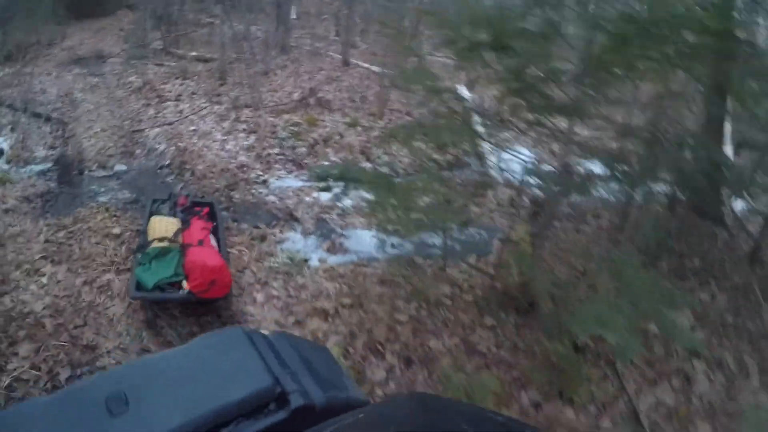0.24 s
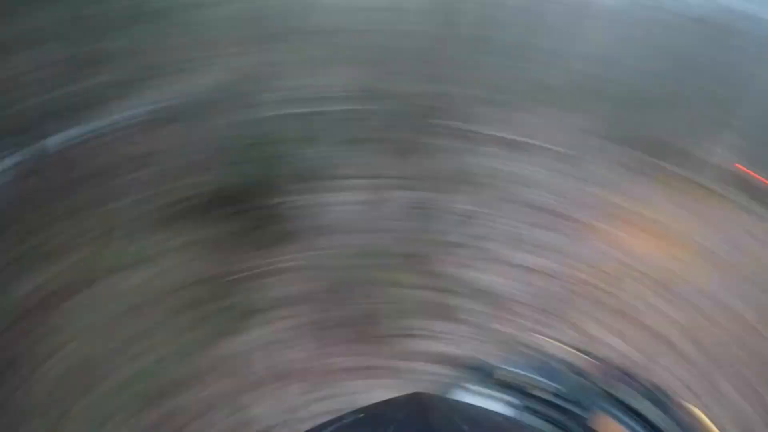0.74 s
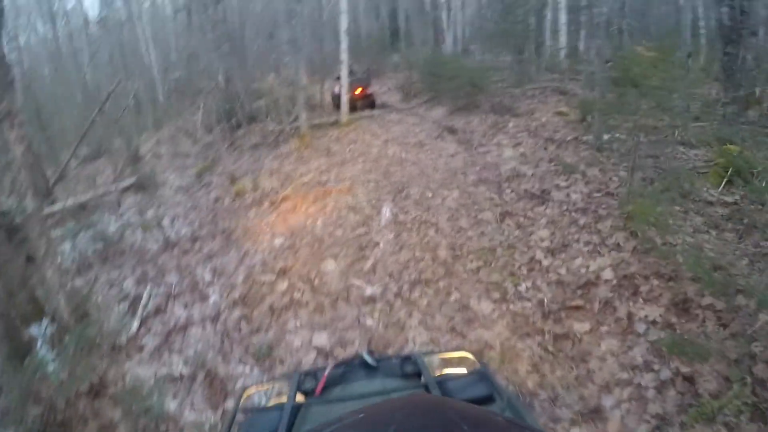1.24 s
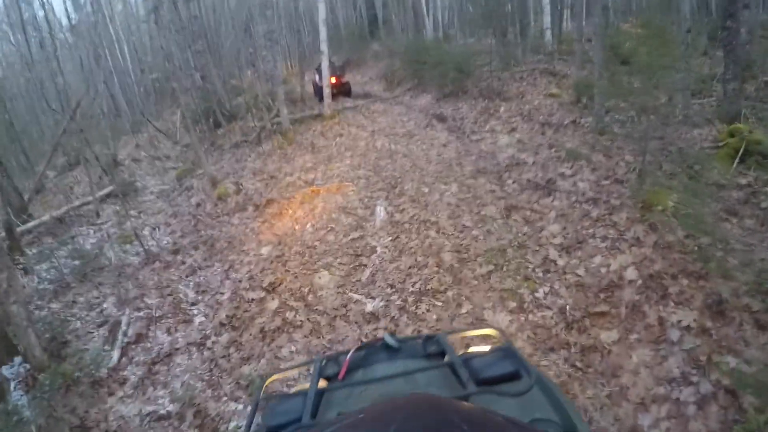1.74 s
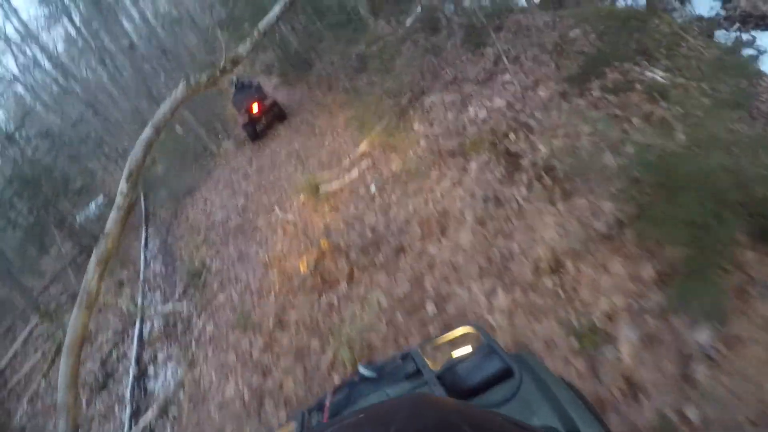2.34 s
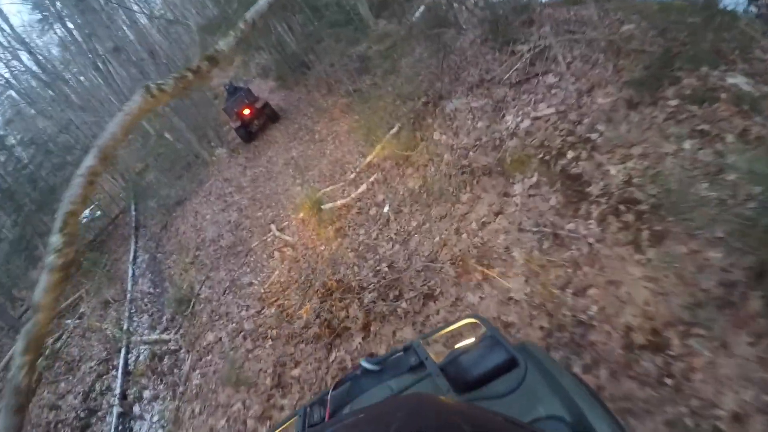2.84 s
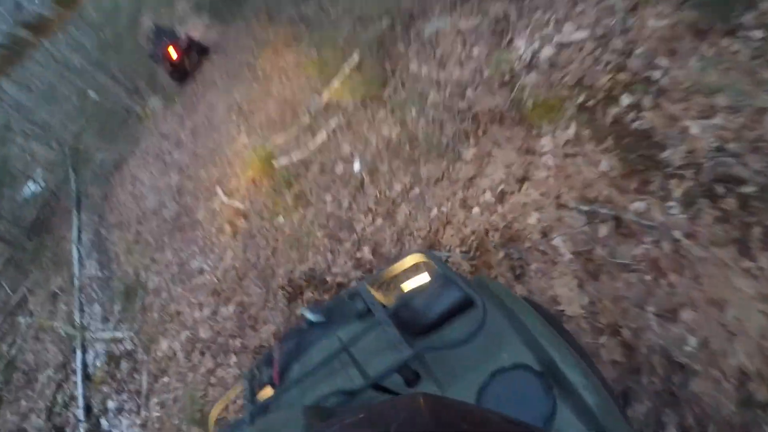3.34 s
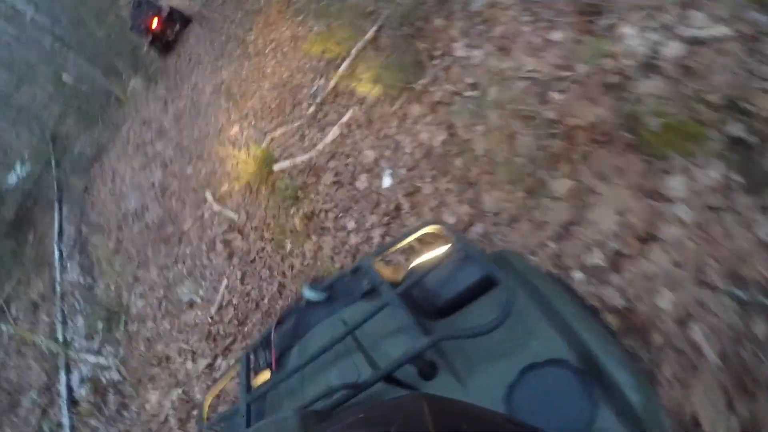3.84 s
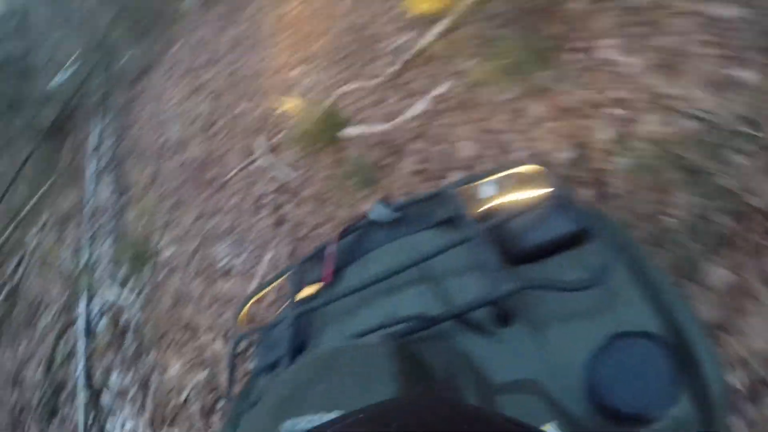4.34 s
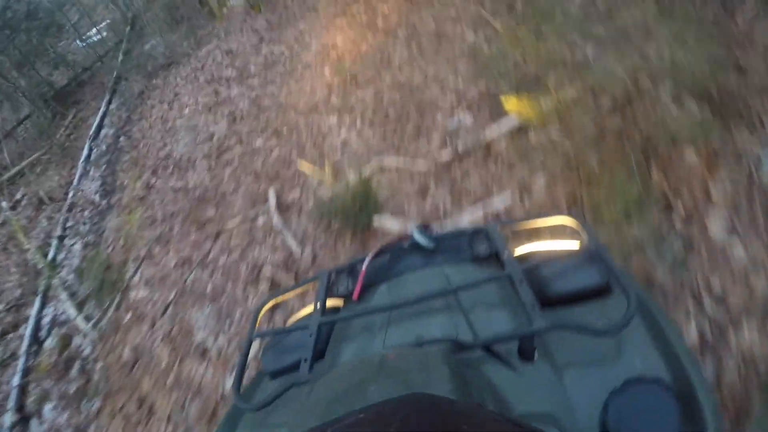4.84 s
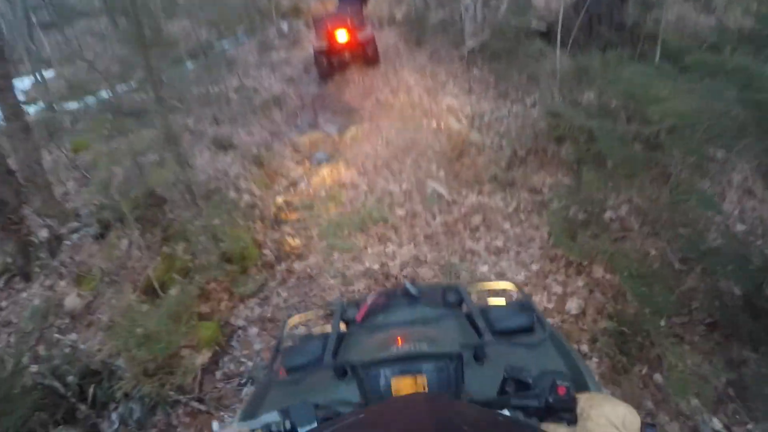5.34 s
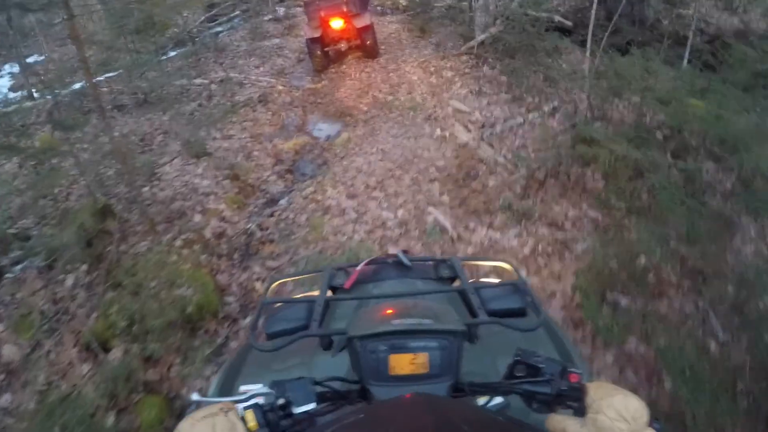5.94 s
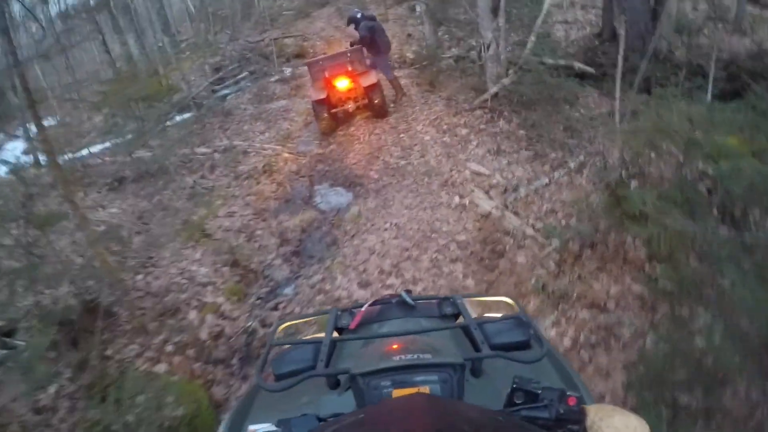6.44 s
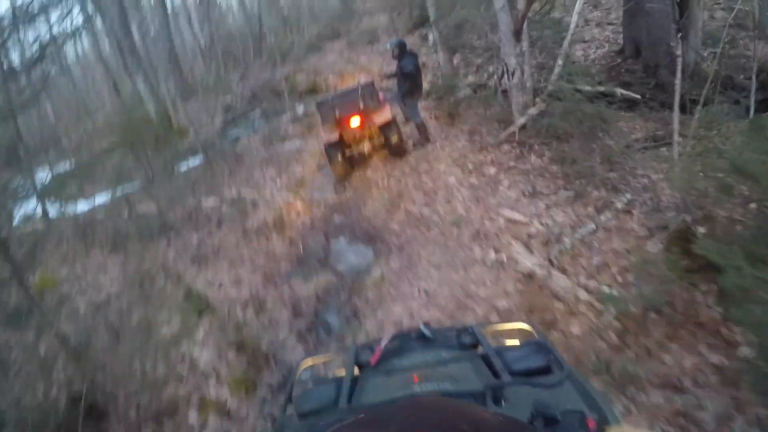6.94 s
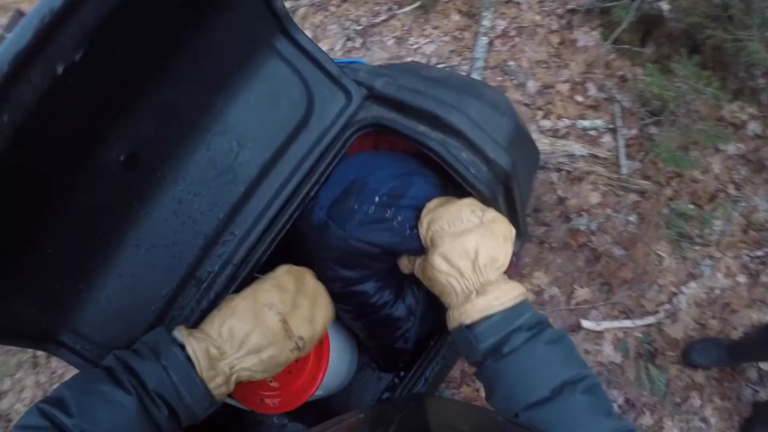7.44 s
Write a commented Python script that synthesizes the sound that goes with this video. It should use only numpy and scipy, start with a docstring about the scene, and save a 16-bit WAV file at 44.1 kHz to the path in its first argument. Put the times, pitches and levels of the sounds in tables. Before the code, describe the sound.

From 0 to 1.1 s a close single-cylinder quad putters at about 14 low thumps per second, with wind rumble, leaf swishes and a cluster of dry twig cracks at 0.2-0.4 s. Around 1.1 s more snaps come as the throttle opens; the engine climbs to about 24 pulses per second, barking and growling until 2.0 s. A hard cut drops it to near idle, with stronger clatter and hissy rustle and the second quad droning ahead. Leaves swish at 2.6 and 3.5 s. At 3.8 s a dull knock hits the microphone housing; the sound sinks, wavers and narrows to the centre, with a modest rev near 4.5 s. At 5.1 s another cut restores level and width: slow idle, the far quad swelling near 5.7 s, a blip at 6.4 s and a rise just before 7.4 s. The last 0.3 s is idle with quick small rustles.

```python
"""Two quads on a leafy trail

A single-cylinder quad idles and revs, heard from the rider's helmet; a second quad runs ahead.
Each firing is a soft-edged click that rings the exhaust; clean tones locked to the crank hum in the frame.
Noise shaped in bands makes the pulsing clatter, the rustling leaves, the hiss and the low wind; twigs snap.
The ride is heard in four joined takes; within the second, at 3.8 s, the balance changes:
after a knock on the microphone housing the sound sinks, narrows and comes back."""
import sys
import numpy as np
from scipy import signal
from scipy.io import wavfile
from scipy.ndimage import uniform_filter1d

SR = 44100
rng = np.random.default_rng(int(sys.argv[2]) if len(sys.argv) > 2 else 0)


def unload_wav(signal):
    """Save mono or channel-first audio to the path in sys.argv[1] as 16-bit WAV at rate SR, clipped to [-1, 1]."""
    wavfile.write(
        sys.argv[1],
        SR,
        np.round(np.clip(np.atleast_2d(signal).T, -1, 1) * 32767).astype(np.int16),
    )


N = 339129  # length in samples

# Times where the balance changes, dividing the sound into five stretches of balance: t/s
STRETCH_STARTS = [2.041, 3.797, 5.09, 7.39]
CHANGE_S = 0.016  # how long each change of balance takes
# Speed of the near engine: t/s, rate/firings per s
NEAR_SPEED = [(0, 14.45), (.45, 13.82), (1.11, 14.53), (1.24, 20.83), (1.51, 21.27), (1.71, 24.22),
              (2.03, 24.22), (2.05, 14.03), (3.32, 14.03), (3.96, 14.71), (4.52, 18.81), (4.74, 15.57),
              (5.08, 14.07), (5.1, 13.13), (5.94, 13.56), (6.34, 13.42), (6.44, 16.06), (6.94, 14.17),
              (7.38, 19.45), (7.4, 13.89), (7.69, 13.88)]
# Its crank position at the start and its jumps where the scene cuts: t/s, jump/cycles
NEAR_JUMPS = [(0, -.44), (2.04, -.42), (5.09, -.39), (7.39, -.43)]
# Speed of the far engine: t/s, rate/firings per s
FAR_SPEED = [(0, 21.83), (.66, 21.3), (2.25, 21.36), (2.65, 21.84), (3.26, 17.09), (3.51, 18.89),
             (4.29, 18.05), (5.08, 20.8), (5.1, 14.33), (5.54, 15.15), (7.38, 14.86), (7.4, 14.78),
             (7.69, 14.78)]
# Its crank position at the start and its jumps where the scene cuts: t/s, jump/cycles
FAR_JUMPS = [(0, -.51), (5.09, -.15), (7.39, -.45)]
IDLE_PER_S = 14  # firings per s at idle
# How far the throttle is open: t/s, opening/0-1
THROTTLE = [(0, 0.23), (1.1, 0.54), (1.15, 1), (1.47, 0.73), (1.54, 1), (1.7, 1), (2.03, 0.87), (2.05, 0.1),
            (3.2, 0), (3.5, 0.48), (4.25, 0), (4.33, 0.47), (4.55, 0.53), (4.8, 0.46), (6.33, 0.18),
            (6.39, 0.8), (6.6, 0.24), (6.8, 0.49), (6.95, 0.51), (7.2, 0.87), (7.38, 0.36), (7.4, 0),
            (7.69, 0.3)]
# Dip in level after the knock: t/s, level/dB
DIP = [(3.79, -5), (3.87, -13.5), (4.0, -6), (4.2, -12), (4.35, -10), (4.56, -4), (5.07, -1.5), (5.1, 3)]
# Stereo width: t/s, width/0-1
STEREO_WIDTH = [(0, 0.55), (4.1, 0.96), (4.5, 0.06), (4.6, 0), (5.07, 0), (5.09, 0.6), (7.69, 0.71)]
# How alike left and right noise are: f/Hz, likeness/-1 to 1
LIKENESS = [(100, 0.92), (250, 0.79), (500, 1), (1000, -0.7), (2500, 0.2), (5000, -0.14), (12000, -0.83)]
# Left minus right at full width, for noise: f/Hz, level/dB
NOISE_LEAN = [(150, 0), (400, -8.5), (1000, -9.5), (2400, -5), (5000, -3.5), (8000, -10.5), (13000, -14.5)]
LOW_LEAN_DB, LOW_LAG_MS = -4, 0.17  # low engine tones at full width: left minus right, right after left

# Ringing tones (modes) all have columns: f/Hz, level/dB, time to fall 60 dB/s, delay/ms
# Near exhaust: low thump
THUMP_MODES = [(102, 0, .085, 0)]
# Near exhaust: steady-sounding low drone
DRONE_MODES = [(120, 0, .2, 2)]
# Near exhaust: bark, columns as above
BARK_MODES = [(217.1, 7.5, 0.096, 0)]
# First ringing that makes the bark build up over a few cycles
BARK_SWELL_MODES = [(225.4, 0, 0.038, 0)]
# Near exhaust: upper throaty tones
THROAT_MODES = [(238.6, 9, 0.095, 0.56), (283.7, -6, 0.16, 0.81), (356.4, -3.5, 0.08, 0.4),
                (424, -3, 0.076, 0.71), (507, -4, 0.071, 0.35), (604, -4, 0.1, 0.42)]
# Exhaust of the quad ahead
FAR_MODES = [(93.6, 2.5, 0.19, 0.29), (125, 5.5, 0.18, -0.22), (219, -9.5, 0.18, 0.7), (298, -16.5, 0.1, 1)]
# Valve ticks
VALVE_MODES = [(2910, -1.5, 0.037, -0.038), (3170, -21, .03, -1.5)]
# Piston slaps
PISTON_MODES = [(730, 3, 0.03, 0), (1270, 1, 0.025, 0), (1800, -1, 0.02, 0)]
# Housing of the microphone
KNOCK_MODES = [(344, -7.5, 0.11, 0), (526, -19, 0.033, 0)]
KNOCK_S = 3.788  # time of the knock

# Layer levels all have columns: five stretch levels/dB, change at full throttle/dB,
# change per firing per s above idle/dB, share of the dip/1
# Exhaust thump
THUMP_LEVEL = (-20, -19.5, -20, -25, -24, 2, -1.0, 1.13)
# Exhaust drone
DRONE_LEVEL = (-20, -21, -27, -25, -23, -2, -.8, 1.2)
# Exhaust bark
BARK_LEVEL = (-21, -25, -27, -32, -28, 9, -0.45, 1.32)
# Exhaust throat
THROAT_LEVEL = (-31, -38, -41.5, -37, -35, 8, 0.96, 1.44)
# Growl at five times the firing rate, stronger under load
GROWL_LEVEL = (-28.5, -23, -32, -38, -40, 12.5, 0.85, 1.63)
# Delay of bark and throat behind the thump: same columns, but in ms (the last is ms per dB of dip)
BARK_LAG = (4, 6, 5.5, 1.5, 1, 1.5, -.8, .5)
# Lower clatter
CLATTER_LEVEL = (-30.5, -29, -40.5, -35.5, -38.5, 3.5, 0.4845, 0.86)
# Upper clatter
UPPER_CLATTER_LEVEL = (-51, -42.5, -61, -52, -52, 10, 0.69, 0.34)
# Engine case
CASE_LEVEL = (-36.5, -28, -40.5, -35.5, -42.5, 2, 0.68, 1.14)
# Valve clicks, before they ring
VALVE_LEVEL = (-58, -54, -76, -62, -56, 17, 1.5, .1)
# Piston clicks, before they ring
PISTON_LEVEL = (-39, -40, -43, -37, -38, 7, 0.35, 0.15)
# Leaf rustle
RUSTLE_LEVEL = (-52, -46, -57, -49.5, -67, -10, -0.02, 0.5)
# Highest part of the rustle
RUSTLE_TOP_LEVEL = (-49.5, -38.5, -63.5, -57.5, -63.5, 7.5, 0.5, 1)
# Band of hiss
HISS_LEVEL = (-56, -72, -54.5, -72, -74, -2, 0.93, 1)
# Wind
WIND_LEVEL = (-20, -26, -30, -30.5, -29, -3, 0, 1.33)
# Crank shaking the frame: times per turn/1, sense/1, layer level (columns as above)
FRAME_SHAKES = [(1, 1, (-25, -20, -42, -48, -37, 7, 1.03, 3)),
                (2, -0.6, (-13, -17.5, -25, -27, -29.5, 3, -1.0, 1.85)),
                (3, 0.89, (-30.5, -26, -48, -47, -38, 7.5, 2.16, 4.7)),
                (4, 0.92, (-44, -40, -68, -34.5, -54, 3.5, 1.03, -0.8))]
# Level of the far exhaust: t/s, level/dB
FAR_LEVEL = [(0, -20.5), (.55, -20), (1.1, -20.5), (2, -37), (2.1, -16), (2.9, -18.5), (3.1, -19),
             (3.8, -18.5), (4, -34.5), (5.1, -22.5), (5.7, -14.5), (6.3, -25), (7, -21.5), (7.69, -19.5)]

# Noise colours all have columns: f/Hz, relative level/dB per Hz
# Lower clatter
CLATTER_LOW = [(220, 5), (300, 2.5), (450, -5), (600, -3), (760, -7), (1000, -5), (1400, -16),
               (1900, -30.5)]
# Upper clatter
CLATTER_HIGH = [(880, -15), (1500, 3), (1780, -9.5), (2060, -2.5), (2370, -7.5), (2950, -4.5),
                (3330, -11.5), (4600, -12.5), (5980, -45), (10100, -120)]
# Rustle
RUSTLE_LOW = [(2350, 3), (4000, -6.5), (4840, 0), (7400, -2), (9620, -0.5), (16300, -120)]
# Top of the rustle
RUSTLE_TOP = [(4000, -27), (6800, 7.5), (7660, -7), (10100, -2.5), (11300, -13), (12500, -28.5),
              (14300, -29), (15300, -35)]
# Resonances of the engine case: f/Hz, width/Hz, level/dB
CASE_RESONANCES = [(736, 86, -9.5), (1174, 110, -8.5), (1810, 180, -36)]
# Edges of the hiss band: f/Hz
HISS_BAND = (4400, 6500)
# Brief swells of the rustle: peak t/s, rise/s, fall/s, level/dB, top above it/dB, dull scrape above it/dB
SWISHES = [(.1, 0.074, 0.039, -47.5, 3.5, -5), (.34, 0.018, .04, -47, 1, 1), (.68, 0.11, .04, -49.5, 1, 3),
           (.8, 0.038, 0.06, -46.5, -10, 9), (2.089, 0.013, 0.14, -46.5, -12, -10),
           (2.3, 0.15, 0.06, -59, 1, -10), (2.63, 0.089, 0.087, -40.5, -2, -7),
           (3.5, 0.18, 0.21, -42, 1, 7), (3.98, 0.077, 0.07, -50.5, -2, 0.5),
           (5.55, .03, 0.075, -41, -11, 1.5), (7.17, 0.01, 0.03, -48, 1, -5.5),
           (7.431, 0.0099, 0.022, -52.5, 9, -20), (7.5, 0.0067, 0.019, -48, 4.5, -14),
           (7.57, 0.0062, 0.017, -51, 5.5, -10), (7.67, 0.029, 0.038, -42.5, 2, -2)]
# Twigs snapping under the wheels: t/s, level/dB, f/Hz, width/octaves, treble above it/dB, thud above it/dB
TWIG_SNAPS = [(.089, -38, 1400, 1.3, 2, 1), (.214, -22, 2530, 0.25, -44, 2),
              (0.299, -26, 1000, 1.3, -28, 10), (0.329, -35, 1400, 1.8, -6, 1),
              (0.348, -25.5, 1520, 0.88, -28, 15), (0.373, -31, 1500, 1.4, -24, -9),
              (1.128, -25, 2700, 0.67, -20, 12), (1.149, -22.5, 1700, 0.87, -30, -3),
              (1.185, -24.5, 2300, 0.93, -30, -6), (2.072, -29, 1400, 2., -6, -8),
              (2.473, -33.5, 1400, 2., 5, 8), (3.412, -26.5, 1600, 1.6, -4, -6),
              (3.853, -36, 2500, 0.71, -22, -2), (5.005, -32, 1160, 0.72, -30, -17),
              (5.544, -31.5, 1800, 3.4, -23, 19.5), (7.172, -30, 1400, 2.3, -18, -3)]

PIPE_CUT_HZ = 64.4  # the open pipe radiates little below this
SILENCER_HZ = 25  # the silencer's volume smooths the low pulses above this
UNEVEN_DB, STEADIER_DB_PER_SPEED = 2.2, .16  # spread of firing strength at idle, less per firing/s above
SHAKE_LAG, SHAKE_LAG_PER_SPEED = 1.25, .035  # radians of crank angle at idle, more per firing/s above
CASE_PULSE_DB = 3.5  # half of the extra drop between firings in the case sound
PUFF_DB, PUFF_DB_AT_FULL = 1, 3  # half of the rustle's drop between firings: closed, added at full throttle
CUTOFF_HZ = 15600  # the top is fully cut from here up

SIDES = np.array([[1], [-1]])  # left, right


def from_db(db):
    """Turn a level in dB into a gain."""
    return 10 ** (np.asarray(db) / 20)


def rms_one(x):
    """Scale a sound to an average strength (rms) of 1."""
    return x / np.sqrt(np.mean(x ** 2) + 1e-20)


def in_time(rows):
    """Draw straight lines between the rows of a table, giving one curve per column."""
    s, *columns = np.transpose(rows)
    return [np.interp(np.arange(N) / SR, s, column) for column in columns]


def at_hz(points, hz):
    """Read a table at a pitch, with octaves equally spaced."""
    table_hz, values = np.array(points).T
    return np.interp(np.log(hz), np.log(table_hz), values)


def above_idle():
    """Near engine speed above idle, in firings per s."""
    return in_time(NEAR_SPEED)[0] - IDLE_PER_S


def stretch_at(s):
    """Number of the stretch of balance at time s, counted from 0."""
    return np.searchsorted(STRETCH_STARTS, s)


def level(layer):
    """Add up a layer's value from its stretch, the throttle, the speed and the dip."""
    *stretch_values, at_full_throttle, per_speed, share = layer
    stretch = stretch_at(np.arange(N) / SR)
    held = uniform_filter1d(np.array(stretch_values, float)[stretch], size=int(CHANGE_S * SR))
    return held + at_full_throttle * in_time(THROTTLE)[0] + per_speed * above_idle() + share * in_time(DIP)[0]


def drift(rate):
    """Slow random wander with spread 1: noise smoothed twice at rate Hz."""
    r = np.exp(-80 * np.pi * rate / SR)  # computed on every 40th sample
    noise = rng.standard_normal(N // 40 + 2002)
    slow = signal.lfilter([1], [1, -2 * r, r * r], noise)[2000:]
    return np.interp(np.arange(N) / 40, np.arange(len(slow)), rms_one(slow))


def crank(speed, jumps):
    """Count the firings so far; after a backward jump the count holds until it catches up."""
    turned = np.cumsum(in_time(speed)[0]) / SR
    turned = turned + sum(cycles * (np.arange(N) >= s * SR) for s, cycles in jumps)
    return np.maximum.accumulate(turned)


def strokes(firings, lead, uneven_db):
    """One click per cycle, each of its own strength, lead seconds ahead of the firing count."""
    at = np.flatnonzero(np.diff(np.floor(firings))) - lead * SR
    at = np.clip(at + rng.normal(0, 6, len(at)), 0, N - 1).astype(int)  # a few samples of jitter
    clicks = np.zeros(N)
    clicks[at] = -from_db(np.broadcast_to(uneven_db, N)[at] * rng.standard_normal(len(at)))
    return clicks


def softened(clicks, hz):
    """Round the edges of clicks, as in a gas pulse."""
    return signal.sosfilt(signal.butter(2, hz, fs=SR, output="sos"), clicks + 1e-18)


def ring(clicks, modes):
    """Clicks set fading tones ringing, neighbours in opposite sense, each with its own delay."""
    out = 0
    for k, (hz, level_db, t60, delay_ms) in enumerate(modes):
        r, w = from_db(-60 / (t60 * SR)), 2 * np.pi * hz / SR
        late = np.roll(clicks, round(delay_ms / 1000 * SR))
        tone = signal.lfilter([0, np.sin(w)], [1, -2 * r * np.cos(w), r * r], late + 1e-18)
        out = out + (-1) ** k * from_db(level_db) * tone
    return out


def rattled(clicks, seconds):
    """Each contact chatters briefly: a burst of noise that fades after every click."""
    fading = signal.lfilter([1], [1, -np.exp(-1 / (seconds * SR))], np.abs(clicks))
    return rng.standard_normal(N) * fading / np.sqrt(seconds * SR / 2)


def puffing(depth_db, ahead):
    """Gain that jumps once a cycle and then drops by twice the depth, with mean power 1."""
    cycle = (crank(NEAR_SPEED, NEAR_JUMPS) + ahead) % 1
    gain = from_db(-2 * np.clip(depth_db, 0, 12) * np.minimum(2.7 * cycle, 1))
    return gain / np.sqrt(uniform_filter1d(gain ** 2, size=SR // 7))


def banded_noise(spectrum, width, patchy_db):
    """Stereo noise in third-octave bands, each with its level, flicker, likeness and lean; middle rms 1."""
    out, together = 0, drift(3.7)
    lowest, highest = spectrum[0][0], spectrum[-1][0]
    edges = lowest * 2 ** np.arange(0, np.log2(highest / lowest) + 1 / 3, 1 / 3)
    white = rng.standard_normal((2, 2, N))
    for k, (low, high) in enumerate(zip(edges, edges[1:])):
        band = signal.butter(2, [low, high], "band", fs=SR, output="sos")
        mid, side = signal.sosfilt(band, white[k % 2])
        hz = np.sqrt(low * high)
        alike = np.clip(at_hz(LIKENESS, hz), -1, 1)
        flicker_db = patchy_db * (.6 * together + 1.6 * drift(22.0))
        gain = from_db(at_hz(spectrum, hz) + flicker_db)
        lean = from_db(at_hz(NOISE_LEAN, hz) / 2 * width * SIDES)
        stereo = np.sqrt(1 + alike) * mid + width * np.sqrt(1 - alike) * side * SIDES
        out = out + gain * lean * stereo
    return out / np.sqrt(np.mean(out.mean(axis=0) ** 2))


def near_exhaust():
    """Each firing rings pipe and silencer; load brings out the upper tones."""
    firings = crank(NEAR_SPEED, NEAR_JUMPS)
    fire = strokes(firings, lead=.0093, uneven_db=UNEVEN_DB - STEADIER_DB_PER_SPEED * above_idle())
    pipe_cut = signal.butter(2, PIPE_CUT_HZ, "high", fs=SR, output="sos")
    sharp = signal.sosfilt(pipe_cut, softened(fire, hz=446))
    full = signal.sosfilt(signal.butter(1, SILENCER_HZ, fs=SR, output="sos"), sharp)
    late = np.interp(np.arange(N) - level(BARK_LAG) / 1000 * SR, np.arange(N), sharp)
    parts = ((THUMP_LEVEL, full, THUMP_MODES), (DRONE_LEVEL, full, DRONE_MODES),
             (BARK_LEVEL, ring(late, BARK_SWELL_MODES), BARK_MODES), (THROAT_LEVEL, late, THROAT_MODES))
    pipe = sum(from_db(level(layer)) * rms_one(ring(pulses, modes)) for layer, pulses, modes in parts)
    growl = uniform_filter1d(np.cos(10 * np.pi * firings + 1.4), size=SR // 500)
    return pipe + from_db(level(GROWL_LEVEL) + 1.5 * drift(17.0)) * rms_one(growl)


def frame_shake():
    """Clean hums locked to the crank, which turns twice per firing."""
    angle = 4 * np.pi * crank(NEAR_SPEED, NEAR_JUMPS) - SHAKE_LAG - SHAKE_LAG_PER_SPEED * above_idle()
    out = 0
    for times, sense, layer in FRAME_SHAKES:
        hum = rms_one(uniform_filter1d(np.cos(times * angle), size=SR // 500))
        out = out + sense * from_db(level(layer) + 1.4 * drift(5.0)) * hum
    return out


def far_exhaust():
    """The quad ahead: firings with duller pulses and uneven strength ring its pipe."""
    fire = strokes(crank(FAR_SPEED, FAR_JUMPS), lead=.0075, uneven_db=2.2)
    return from_db(in_time(FAR_LEVEL)[0]) * rms_one(ring(softened(fire, hz=270), FAR_MODES))


def case_hum():
    """Broad shaking heard through the narrow resonances of the engine case."""
    out, shaking = 0, rng.standard_normal((2, N))
    shaking[1] += 0.25 * shaking[0]
    for hz, width_hz, level_db in CASE_RESONANCES:
        r = np.exp(-np.pi * width_hz / SR)
        band = signal.lfilter([1, 0, -1], [1, -2 * r * np.cos(2 * np.pi * hz / SR), r * r], shaking)
        out = out + from_db(level_db + 1.9 * drift(7.1)) * rms_one(band)
    return out * from_db([[.1], [-.1]])


def clatter(width):
    """Chain, gears and panels: noise pulsing with the firing, more deeply as the crank turns faster."""
    depth_db = 0.25 + 0.081 * above_idle()
    case = case_hum() * from_db(level(CASE_LEVEL)) * puffing(CASE_PULSE_DB, ahead=0.2)
    middle = case.mean(axis=0)
    case = middle + width * (case - middle)
    low = from_db(level(CLATTER_LEVEL)) * banded_noise(CLATTER_LOW, width, patchy_db=1.0) + case
    high = from_db(level(UPPER_CLATTER_LEVEL)) * banded_noise(CLATTER_HIGH, width, patchy_db=1.7)
    return low * puffing(depth_db, ahead=0.2) + high * puffing(depth_db, ahead=0.43)


def valves():
    """Once a cycle a valve seats and the piston slaps, ahead of the exhaust pulse."""
    firings = crank(NEAR_SPEED, NEAR_JUMPS)
    seats = strokes(firings, lead=0.021, uneven_db=1.2) * from_db(level(VALVE_LEVEL))
    slaps = strokes(firings, lead=0.027, uneven_db=0.0) * from_db(level(PISTON_LEVEL))
    knocks = rattled(uniform_filter1d(slaps, size=SR // 120), seconds=0.011)
    ticks = seats + 0.2 * rattled(seats, seconds=0.008)
    return (ring(ticks, VALVE_MODES) + ring(knocks, PISTON_MODES)) * from_db([[-1.5], [1.5]])


def swells(above_db):
    """Gain of all swishes: each grows to its peak and dies away, within its own stretch."""
    t = np.arange(N) / SR
    stretch = stretch_at(t)
    gain = 0
    for (s, rise, fall, db, *_), extra in zip(SWISHES, above_db):
        shape = np.exp(-np.maximum((s - t) / rise, (t - s) / fall))
        gain = gain + from_db(db + extra) * shape * (stretch == stretch_at(s))
    return gain


def rustle(width):
    """Dry leaves and leaking air hiss in the treble, with brief swishes on top."""
    *_, top_db, scrape_db = np.transpose(SWISHES)
    low_gain = np.hypot(from_db(level(RUSTLE_LEVEL)), swells(0 * top_db))
    top_gain = np.hypot(from_db(level(RUSTLE_TOP_LEVEL)), swells(top_db))
    low = banded_noise(RUSTLE_LOW, width, patchy_db=0.9) * low_gain
    top = banded_noise(RUSTLE_TOP, width, patchy_db=0.92) * top_gain
    dull = signal.butter(2, [600, 2800], "band", fs=SR, output="sos")
    scrape = signal.sosfilt(dull, rng.standard_normal((2, N)))
    puffs = puffing(PUFF_DB + PUFF_DB_AT_FULL * in_time(THROTTLE)[0], ahead=0.028)
    return (low + top) * puffs + rms_one(scrape) * swells(scrape_db)


def hiss():
    """A gently wavering band of hiss in the middle of the stereo picture."""
    band = signal.butter(3, HISS_BAND, "band", fs=SR, output="sos")
    noise = signal.sosfilt(band, rng.standard_normal(N))
    return from_db(level(HISS_LEVEL) + 0.95 * drift(9.0)) * rms_one(noise)


def wind(level_db):
    """Lumpy low noise on the microphone ports, its own in each channel."""
    band = signal.butter(2, [38, 260], "band", fs=SR, output="sos")
    low = signal.sosfilt(band, rng.standard_normal((2, N)))
    return from_db(level_db + 4.9 * drift(2.8)) * rms_one(low)


def snaps():
    """Each twig gives a dry crack with a short noisy tail: woody, bright and a low thud."""
    t = np.arange(SR // 12) / SR
    out = np.zeros((2, N))
    bright = signal.butter(2, [5000, 10500], "band", fs=SR, output="sos")
    low = signal.butter(2, [250, 800], "band", fs=SR, output="sos")
    fade = np.exp(-t / 0.0058) + 0.14 * np.exp(-t / 0.019)
    shape = (1 - np.exp(-t / 0.00089)) * fade * 1.18
    for s, level_db, hz, octaves, treble_db, thud_db in TWIG_SNAPS:
        edges = hz * 2 ** (max(octaves, .1) / 2 * np.array([-1, 1]))
        woody = signal.butter(3, edges, "band", fs=SR, output="sos")
        noise = rng.standard_normal((3, len(t))) * shape
        noise = noise[:2] + 1.42 * noise[2]  # own noise per side plus a shared part
        burst = signal.sosfilt(woody, noise) + from_db(treble_db) * signal.sosfilt(bright, noise)
        burst += from_db(thud_db) * signal.sosfilt(low, noise)
        start = round(s * SR)
        out[:, start:start + len(t)] += from_db(level_db) * burst
    return out


def knock():
    """One dull blow rings the microphone housing, stronger on the right."""
    click = np.zeros(N)
    click[round(KNOCK_S * SR)] = 1
    return ring(click, KNOCK_MODES) * from_db([[-6.0], [3.0]])


def scene():
    """Mix all layers; exhausts reach both ports nearly alike, slightly apart in level and time."""
    width = np.clip(in_time(STEREO_WIDTH)[0], 0, 1)
    pipes = near_exhaust() + frame_shake() + far_exhaust()
    shift = width * LOW_LAG_MS / 2000 * SR  # half the lag, in samples
    lagged = [np.interp(np.arange(N) + k * shift, np.arange(N), pipes) for k in (1, -1)]
    engine = lagged * from_db(LOW_LEAN_DB / 2 * width * SIDES) + clatter(width) + valves()
    return engine + rustle(width) + hiss() + width * wind(level(WIND_LEVEL)) + snaps() + knock()


def record(dry):
    """Cut the deepest bass, round the peaks, then cut the top."""
    dry = signal.sosfilt(signal.butter(2, 20, "high", fs=SR, output="sos"), dry)
    rounded = 1.122 * np.tanh(dry / 1.043)
    return signal.sosfilt(signal.cheby2(12, 70, CUTOFF_HZ, fs=SR, output="sos"), rounded)


dry = scene()
out = record(dry)
unload_wav(out)
```